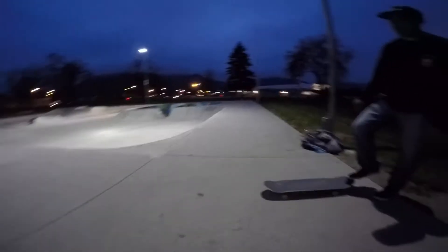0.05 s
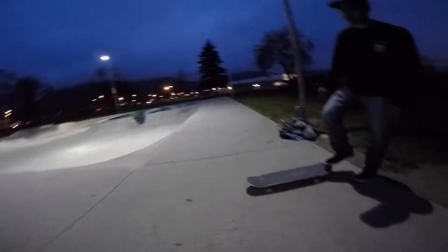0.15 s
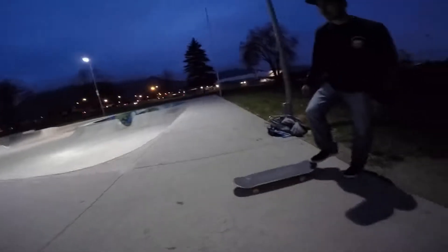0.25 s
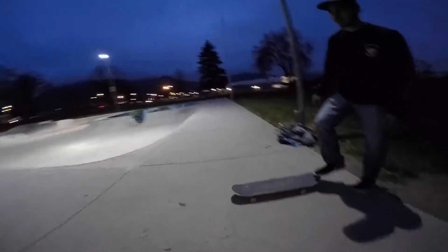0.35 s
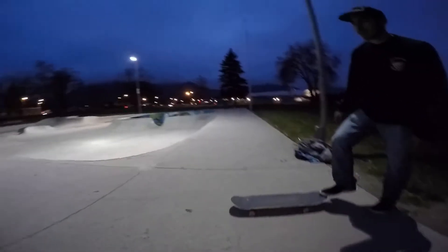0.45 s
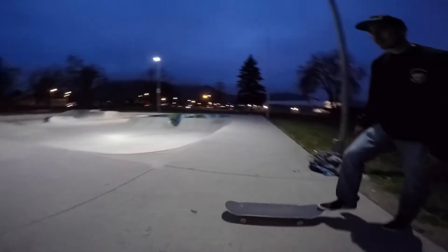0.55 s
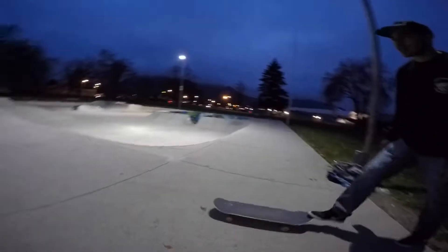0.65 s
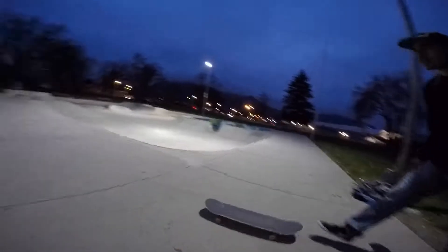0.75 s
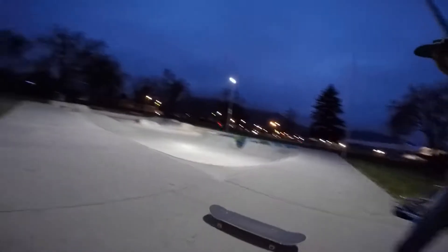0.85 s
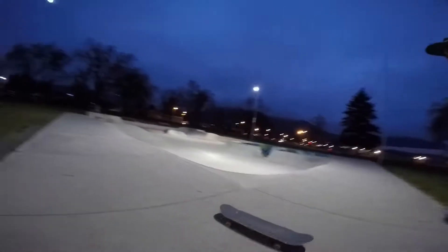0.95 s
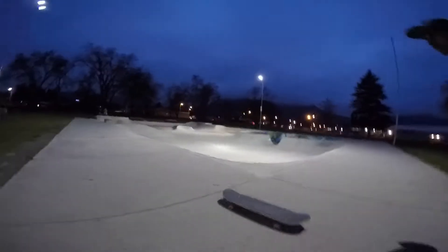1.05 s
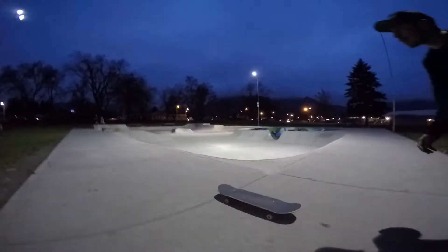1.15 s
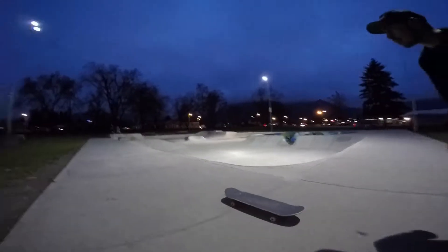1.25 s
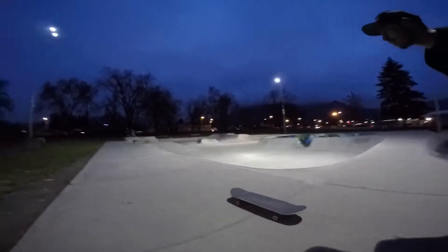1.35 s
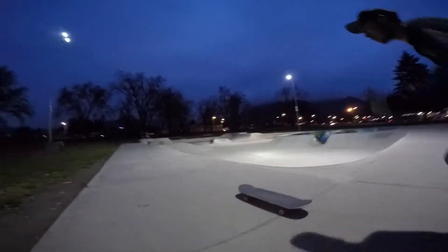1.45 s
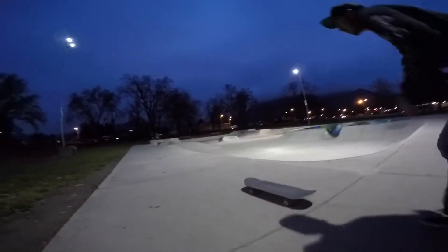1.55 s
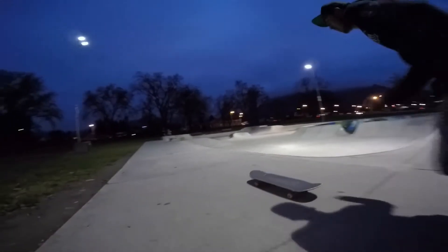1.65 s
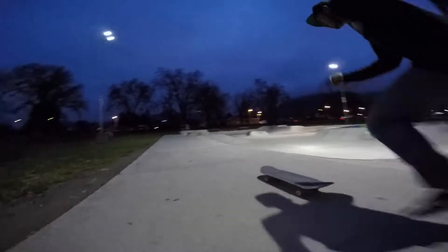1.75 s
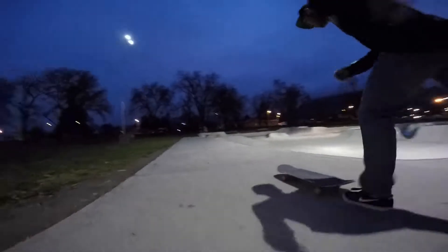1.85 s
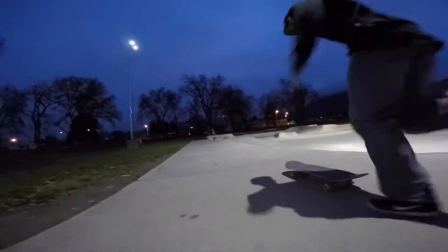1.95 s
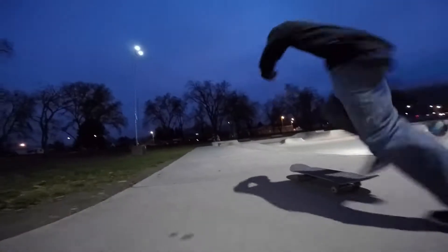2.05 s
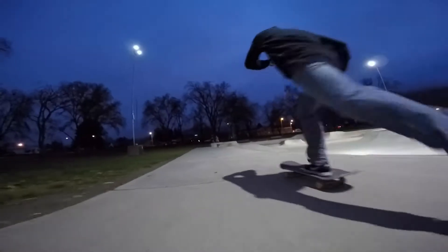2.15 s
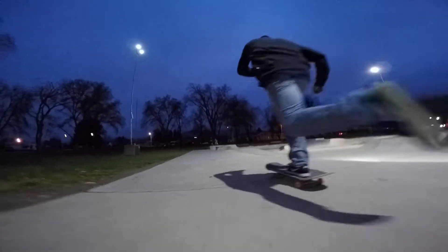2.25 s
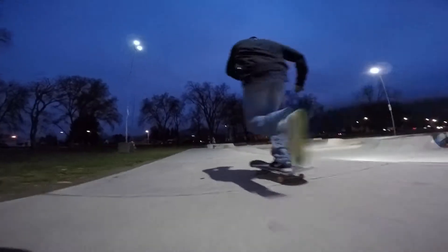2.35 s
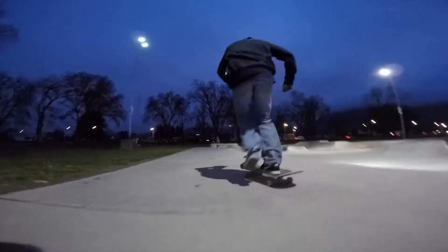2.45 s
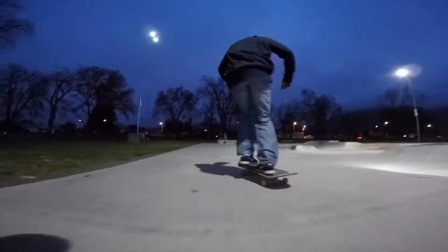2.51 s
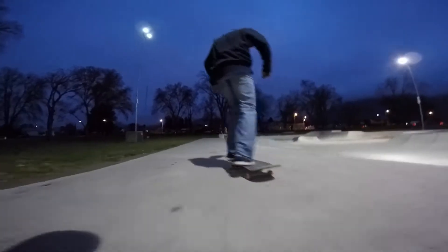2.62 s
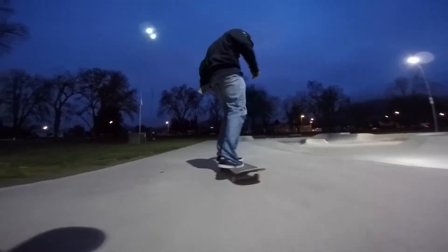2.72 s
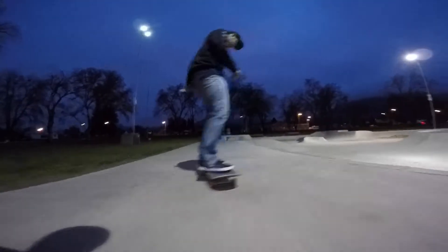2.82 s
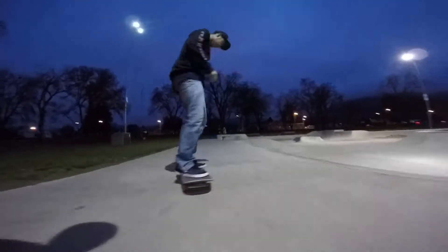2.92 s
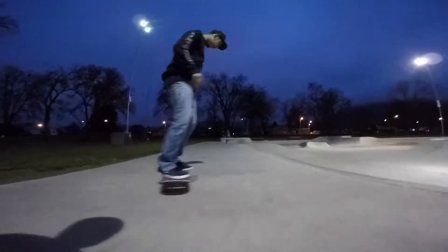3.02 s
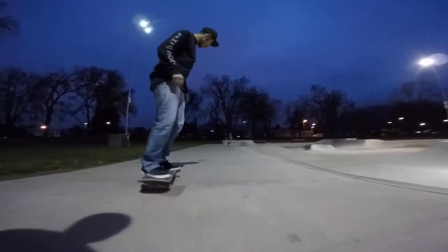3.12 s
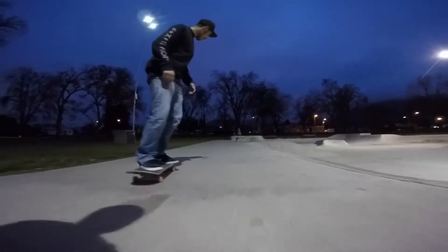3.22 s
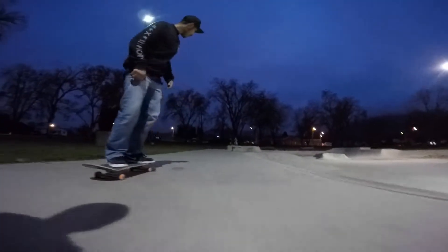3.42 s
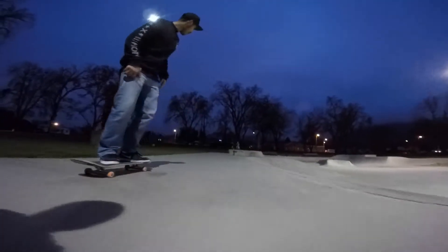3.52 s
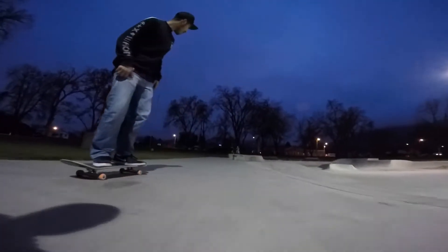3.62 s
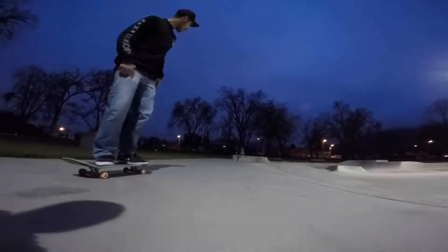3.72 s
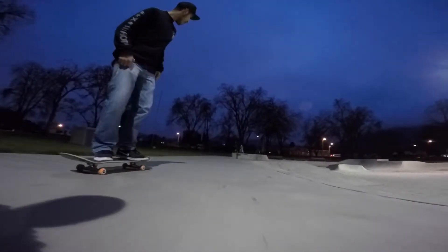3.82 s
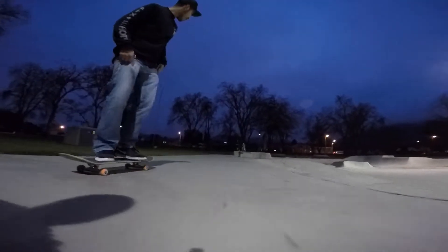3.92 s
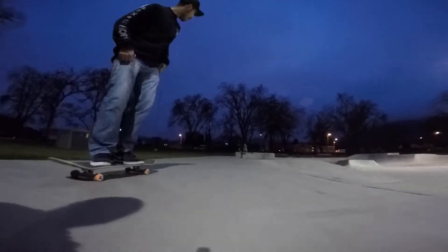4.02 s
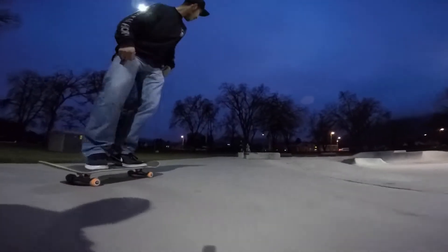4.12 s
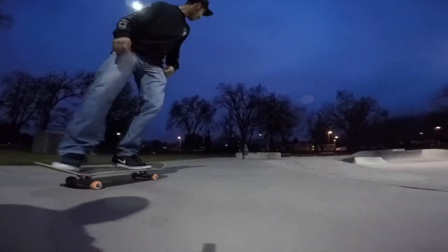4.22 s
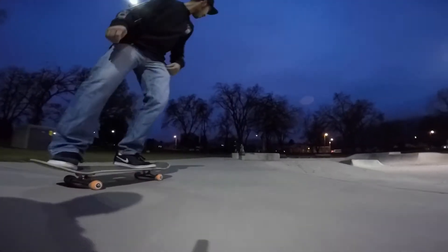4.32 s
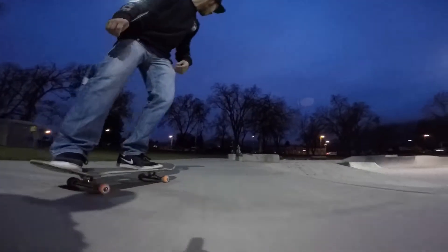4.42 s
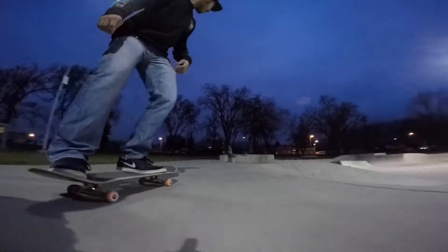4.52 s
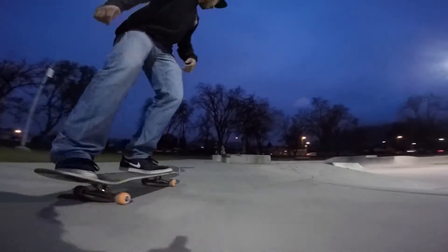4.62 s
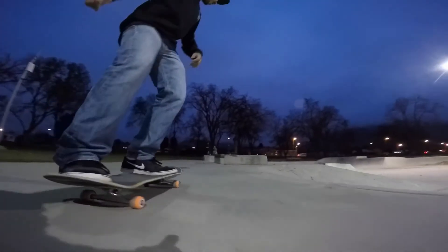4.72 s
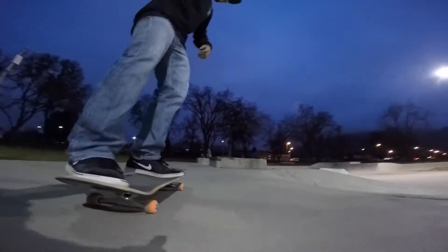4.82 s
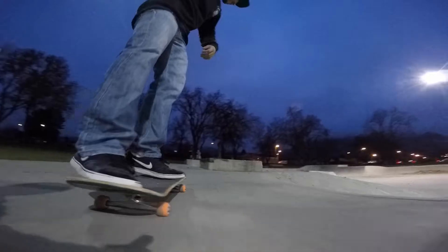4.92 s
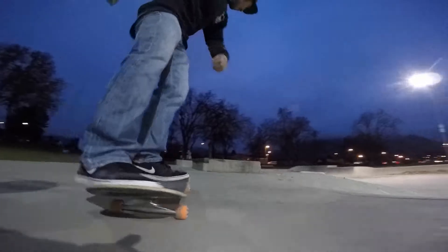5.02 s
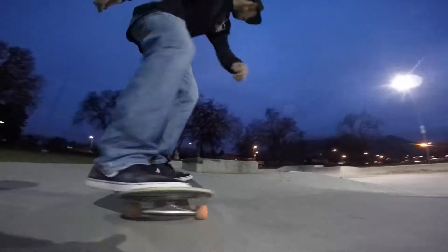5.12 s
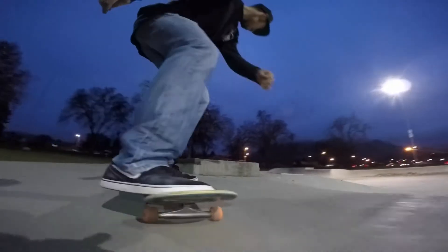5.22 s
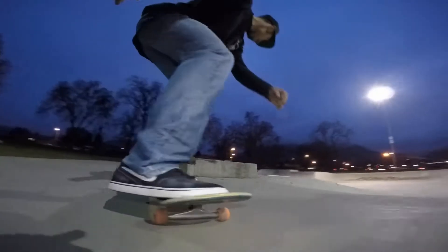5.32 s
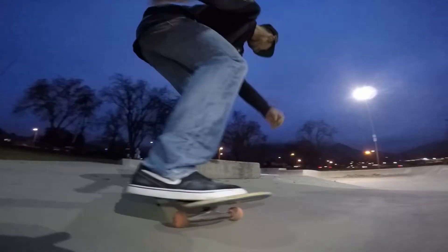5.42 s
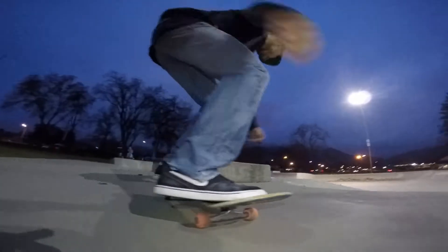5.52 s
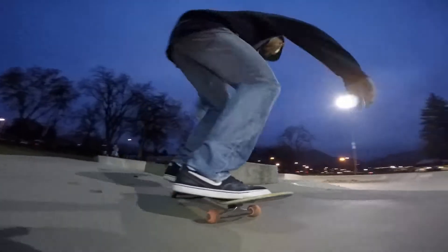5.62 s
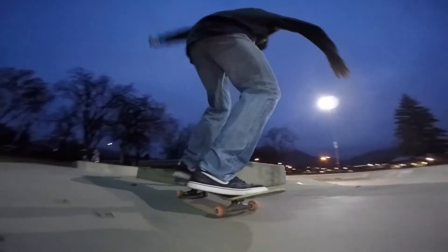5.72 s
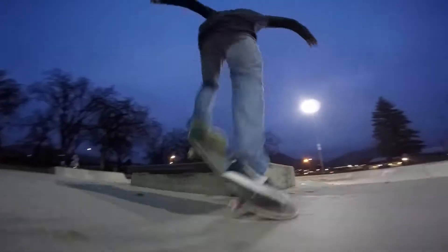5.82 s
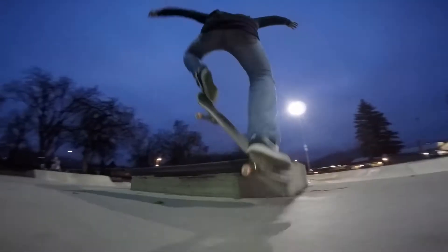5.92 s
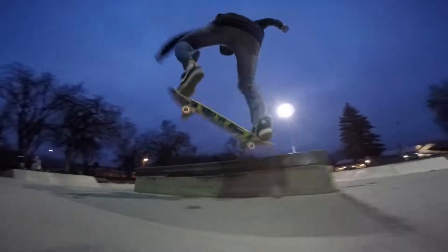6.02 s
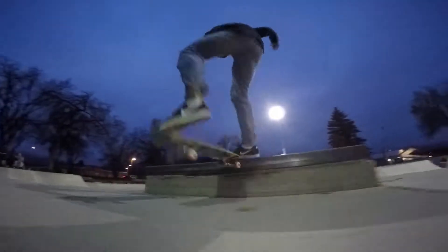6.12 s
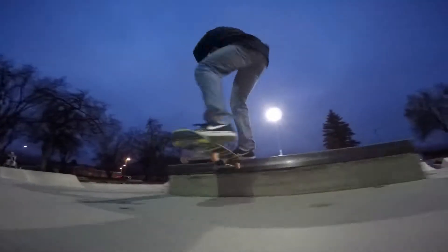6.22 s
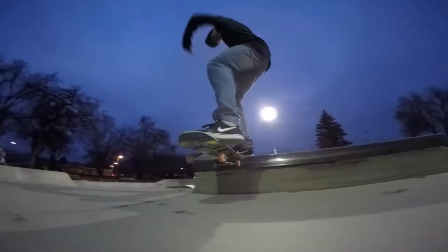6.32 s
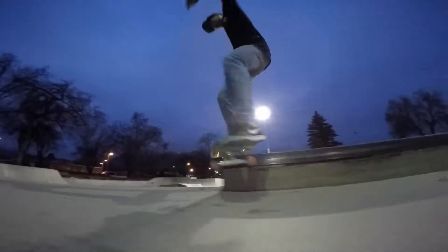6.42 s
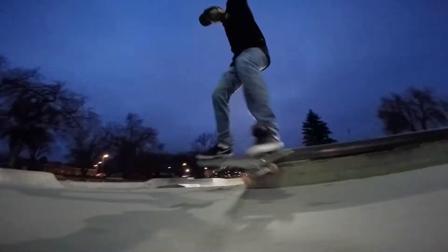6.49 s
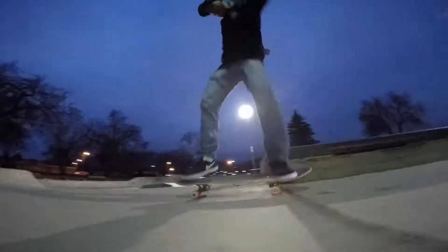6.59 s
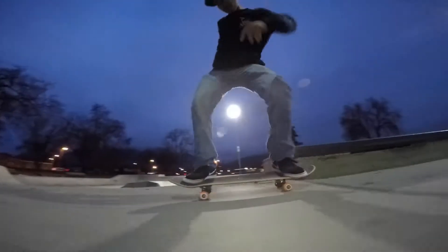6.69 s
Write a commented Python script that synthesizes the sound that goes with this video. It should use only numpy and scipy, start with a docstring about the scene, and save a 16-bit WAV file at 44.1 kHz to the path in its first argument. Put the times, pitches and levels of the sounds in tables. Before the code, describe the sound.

In an outdoor skatepark, a close, moving microphone picks up low gusts of wind and a skateboard on concrete. The board drops with a ringing smack and coasts, ticking over grit. Thuds follow as the rider jumps on, and the roll turns heavier, with frequent sharp clacks. Near the end come a loud wooden crack, a hard hit and short metallic scrape on a ledge, and a clatter.

```python
"""A skateboard on the concrete of an open skatepark, heard from a microphone that follows it.
The board is dropped and rolls away empty; the skater jumps on, rides over slab joints, pops the tail,
grinds a ledge and clatters down. Impacts excite the damped modes of deck and trucks, and surface
roughness drives the rolling noise. Turbulent air buffets the microphone; the hardest blows overload it."""
import sys
import numpy as np
from scipy import signal
from scipy.fft import rfft, irfft, next_fast_len
from scipy.io import wavfile
from scipy.ndimage import uniform_filter1d, map_coordinates

SR = 44100
rng = np.random.default_rng(int(sys.argv[2]) if len(sys.argv) > 2 else 0)


def waveform_to_disk(signal):
    """Save audio, clipped to [-1, 1], as 16-bit WAV at the path in sys.argv[1]."""
    frames = np.transpose(np.atleast_2d(signal))
    scaled = np.clip(frames, -1, 1) * 32767
    samples = np.round(scaled).astype(np.int16)
    wavfile.write(sys.argv[1], SR, samples)


N = 297675
TIME, HIT_TIME = np.arange(N) / SR, np.arange(SR // 8) / SR
DROP_S, TRAP_S, MOUNT_S = 0.0255, 0.28, 2.18  # the board lands; a foot stills it; the skater jumps on

# envelope of the empty board's roll: (time [s], relative rasp level [dB], relative hum level [dB])
EMPTY_ROLL = [(0.3, -77, -80), (0.578, -49, -47), (0.882, -33.5, -37.5), (1.474, -37, -43.5),
              (2.01, -35.5, -45), (2.15, -37, -48)]
# envelope of the roll under the skater: (time [s], relative level [dB])
RIDDEN_ROLL = [(2.2, -28), (2.41, -31), (2.78, -20.5), (2.85, -19), (2.98, -37.5), (3.2, -34),
               (3.34, -28.5), (3.45, -28.5), (3.81, -31), (3.99, -36.5), (4.76, -33.5), (5.75, -30.5),
               (5.9, -40.5), (6.63, -42.5), (6.75, -34)]
# path from board to microphone: (time [s], distance [m])
DISTANCE = [(2.2, 1.2), (3.1, 1.92), (3.7, 1.22), (5.25, 1.09), (6.75, 1.42)]
# spectrum of a wheel striking sand or stone: (frequency [Hz], level [dB])
SAND = [(900, -11), (2500, 7.5), (3400, -3.5), (5000, -12.5), (7000, -25), (15000, -34.5)]


def amp(db):
    """Amplitude ratio of a level in decibels."""
    return 10 ** (np.asarray(db) / 20)


def unit(x):
    """Normalisation to rms 1."""
    return x / np.sqrt(np.mean(x ** 2) + 1e-20)


def unit_burst(x):
    """Normalisation of a transient: its loudest 5 ms have rms 1."""
    return x / np.sqrt(uniform_filter1d(x ** 2, 220, mode="constant").max() + 1e-20)


def along(points, hz):
    """Interpolation of (frequency [Hz], value) points on a logarithmic axis."""
    f, v = np.transpose(points)
    return np.interp(np.log(hz + 1), np.log(f + 1), v)


def curves(rows):
    """Piecewise linear envelopes, one for each column after the time."""
    times, *columns = np.transpose(rows)
    return [np.interp(TIME, times, column) for column in columns]


def wobble(rate):
    """Smooth random modulation with rate knots a second."""
    return map_coordinates(rng.standard_normal(int(N * rate / SR) + 4), [TIME * rate])


def arch(t, length):
    """A rounded envelope: the square root of a half sine."""
    return np.sqrt(np.abs(np.sin(np.pi * np.clip(t / length, 0, 1))))


def add(track, s, sound):
    """Superposition of a sound on the track at time s."""
    start = max(round(s * SR), 0)
    track[start:start + len(sound)] += sound[:N - start]


def filtered(x, response):
    """Linear filtering: the spectrum of x times a frequency response."""
    size = next_fast_len(len(x) + SR // 8, real=True)
    return irfft(rfft(x, size) * response(np.fft.rfftfreq(size, 1 / SR)), size)[:len(x)]


def coloured(x, spectrum):
    """Spectral shaping of x, at rms 1."""
    return unit(filtered(x, lambda hz: amp(along(spectrum, hz))))


def impulse(spectrum, size=1024):
    """Minimum-phase impulse response of a spectrum, by folding its cepstrum."""
    cepstrum = irfft(np.log(amp(along(spectrum, np.fft.rfftfreq(size, 1 / SR)))))
    cepstrum[1:size // 2] *= 2
    cepstrum[size // 2 + 1:] = 0
    return irfft(np.exp(rfft(cepstrum)))


def varied(spectrum):
    """Each contact meets the ground at a new angle, which scatters its spectrum by about 3 dB."""
    return [(hz, db + rng.normal(0, 3)) for hz, db in spectrum]


def resonate(x, modes):
    """Forced response of parallel second-order resonators of alternating sign."""
    return filtered(x, lambda f: sum((-1) ** k * amp(db) * hz * width / (hz**2 - f**2 + 1j * f * width)
                                     for k, (hz, width, db) in enumerate(modes)))


def ring(modes, detune):
    """Free vibration: damped sinusoids, each scattered in level and frequency."""
    t, scatter_db = HIT_TIME, rng.normal(0, 3, len(modes))
    return sum(amp(db + extra - 60 * t / t60) * np.sin(2 * np.pi * hz * rng.normal(1, detune) * t)
               for (hz, db, t60), extra in zip(modes, scatter_db))


def struck(force, response):
    """Convolution of a contact force with a body's impulse response, at unit strength."""
    return unit_burst(signal.fftconvolve(force, response)[:len(force)])


def chatter(length, t60, gap_s):
    """Contact force: a strike and quick rebounds, dwindling after length seconds, add in energy."""
    rebounds = np.cumsum(gap_s * rng.uniform(0.28, 1.7, size=16))
    sizes = amp(rng.normal(-1, 2, size=16)) / (1 + (rebounds / max(length, 0.001)) ** 6)
    age = HIT_TIME - np.append(0, rebounds)[:, None]
    pulses = (age >= 0) * np.append(1, sizes)[:, None] * amp(-60 * np.abs(age) / t60)
    return np.linalg.norm(pulses, axis=0) * rng.standard_normal(len(HIT_TIME))


def grit(rate, spread_db):
    """Shot noise: rate tiny impacts a second on the grain of the concrete."""
    impacts = (rng.random(N) < rate / SR) * rng.standard_normal(N)
    return unit(impacts * amp(spread_db * rng.standard_normal(N)))


def shimmer(x, depth_db):
    """Random drifting peaks and dips imitate interference with a shifting ground reflection."""
    frames = signal.stft(x, nperseg=1024)[2]
    ripple = uniform_filter1d(rng.standard_normal(frames.shape), size=3, axis=0)
    ripple = unit(uniform_filter1d(ripple, size=28, axis=1))
    return unit(signal.istft(frames * amp(depth_db * ripple), nperseg=1024)[1][:N])


def weight():
    """Loading: 0 while the board is empty, 1 once the skater is on it."""
    return np.clip((TIME - MOUNT_S) / 0.004, 0, 1)


def untrapped():
    """Damping by a foot: 1 while the dropped board rings freely, 0 once it is stilled."""
    return np.clip((TRAP_S - TIME) / 0.035 + 1, 0, 1)


def wind():
    """Turbulent pressure fluctuations on the moving microphone, over the hush of the park."""
    gusts = [(0.33, -49.5), (1.29, -22.5), (1.74, -25.5), (2.24, -20.5), (2.98, -18), (3.07, -33.5),
             (3.95, -21.5), (3.98, -28), (5.24, -26.5), (5.38, -14.5), (5.81, -15.5), (6.26, -29),
             (6.75, -30)]  # (time [s], level [dB])
    # spectra of turbulence and hush: (frequency [Hz], level [dB])
    buffet_spectrum = [(12, -9.5), (30, 3.5), (80, -2), (150, -9.5), (250, -16), (420, -22), (650, -65.5)]
    hush_spectrum = [(30, -4.5), (240, -3), (400, -18), (1000, -23.5), (2300, -19), (5000, -35),
                     (15000, -76)]
    buffet = amp(curves(gusts)[0] + wobble(13)) * coloured(rng.standard_normal(N), buffet_spectrum)
    return buffet + amp(-49.5) * coloured(rng.standard_normal(N), hush_spectrum)


def slaps():
    """A short contact has a wide spectrum: bare wood or metal hits concrete and rings the whole plank."""
    # (time [s], crack level [dB], thud level [dB], click level [dB], rattle length [s])
    blows = [(0.0245, -6.5, -6, -8, 0.003), (5.880, -2.5, -21, -8.5, 0.0037),
             (6.1641, -7.5, -11.5, -6.5, 0.0038), (6.6375, -11.5, -17.5, -20, 0.0025),
             (6.6855, -18, -21, -21, 0.004), (6.698, -18, -43, -35, 0.0031)]
    plank_modes = [(1522, 210, -2), (1604, 144, 0), (2115, 240, 5.5), (2686, 510, -2.5), (3100, 140, 1.5),
                   (4060, 170, -10.5), (4630, 880, -17.5)]  # (frequency [Hz], bandwidth [Hz], level [dB])
    click_spectrum = [(2800, -11), (3700, 18.5), (4400, 11.5), (5600, -4), (7500, -3), (11500, -13),
                      (15000, -15)]  # (frequency [Hz], level [dB])
    out, edge = np.zeros(N), impulse(click_spectrum)
    for s, crack_db, thud_db, click_db, length in blows:
        force = chatter(length, t60=0.0073, gap_s=0.00098)
        crack = amp(crack_db) * unit_burst(resonate(force, plank_modes))
        thud = amp(thud_db) * deck_bend(force, s, detune=0.02)
        add(out, s, crack + thud + amp(click_db) * struck(force, edge))
    return out


def deck_bend(force, s, detune):
    """Bending modes thud, deeper under load; below them air flows round the deck and radiates little."""
    bending_modes = [(249, -31, 0.053), (331, 12.5, 0.012), (414.4, 1, 0.044), (508.7, -3, 0.057)]  # (frequency [Hz], level [dB], t60 [s])
    cutoff_hz = 117 if s > MOUNT_S else 260
    radiation = signal.butter(2, cutoff_hz, "highpass", fs=SR, output="sos")
    return struck(force, signal.sosfilt(radiation, ring(bending_modes, detune)))


def park_echo(x):
    """Reverberation: ramps and trees scatter a thin tail that lasts longest in the midrange."""
    decay_times = [(200, 0.063), (2200, 0.3), (5000, 0.11)]  # (frequency [Hz], t60 [s])
    hz, t, frames = signal.stft(rng.standard_normal(SR), SR, nperseg=256)
    envelope = amp(-60 * t / along(decay_times, hz)[:, None]) * (1 - np.exp(-t / 0.0076))
    tail = signal.istft(frames * envelope, SR, nperseg=256)[1]
    return signal.fftconvolve(x, tail / np.linalg.norm(tail))[:N]


def free_ring(level_db, t60):
    """Lightly damped resonance: loose trucks keep the dropped board ringing until a foot stills it."""
    free_modes = [(357, 11, 6.5), (438, 21, 4.5), (558, 24, -7.5), (2100, 600, -9), (2950, 250, -12),
                  (3900, 200, -29), (6450, 250, -29)]  # (frequency [Hz], bandwidth [Hz], level [dB])
    out = np.zeros(N)
    shiver = unit(filtered(resonate(rng.standard_normal(SR), free_modes), lambda hz: hz > 300))
    add(out, DROP_S, amp(level_db - 60 * TIME[:SR] / t60) * shiver)
    return out * untrapped()


def empty_roll(rasp_gain_db, hum_gain_db):
    """Roughness excitation: light wheels rasp and the deck hums; after the drop the trucks buzz alike."""
    # spectra of wheels and free deck: (frequency [Hz], level [dB])
    rasp_spectrum = [(400, -31), (560, -8), (1350, -10), (1750, -2.5), (2450, -2.5), (3300, -13),
                     (4300, -14), (6300, -29.5), (15000, -43.5)]
    hum_spectrum = [(150, -49), (240, 7.5), (285, -24), (365, 9.5), (410, 3), (465, -8), (550, 0),
                    (800, -44.5)]
    rasp_db, hum_db = curves(EMPTY_ROLL)
    age = TIME - DROP_S
    buzz = (age > 0) * untrapped() * amp(-27.5 - 89 * age)  # decays by 89 dB a second
    skitter = amp(0.7 * wobble(60))
    rasp = shimmer(coloured(grit(rate=9000, spread_db=2), rasp_spectrum), depth_db=3)
    rasp *= (amp(rasp_db + rasp_gain_db) + amp(-5.5) * buzz) * skitter
    hum = (amp(hum_db + hum_gain_db) + buzz) * coloured(grit(rate=1200, spread_db=2), hum_spectrum)
    return (1 - weight()) * (rasp + hum)


def bumps(clack_gain_db, thud_gain_db, click_gain_db):
    """Impact excitation: a bump clacks the wheels, rings and bends the deck and, under load, clicks."""
    # knocks of the rolling board, landing feet, one faint slab joint and the final tumble:
    # (time [s], relative clack level [dB], relative thud level [dB], rattle length [s])
    knocks = [(0.049, -20.5, -23, 0.0071), (0.172, -23, -37, 0.005), (0.741, -21, -21.5, 0.0039),
              (1.293, -16, -27, 0.0079), (1.523, -18.5, -22, 0.0053), (1.966, -22, -20, 0.0026),
              (2.29, -12, -7.5, 0.00098), (2.295, -10.5, -5.5, 0.006), (2.31, -15, -14.5, 0.0089),
              (2.354, -13.5, -15, 0.008), (2.391, -10.5, -17, 0.02), (2.403, -15.5, -4.5, 0.017),
              (2.438, -12, -11.5, 0.0098), (2.574, -11.5, -5, 0.0065), (2.626, -15, -7, 0.0048),
              (2.665, -26, -13, 0.0038), (2.893, -15, -12, 0.0089), (2.935, -15.5, -34, 0.01),
              (2.955, -6, -0.5, 0.017), (3.537, -14.5, -14, 0.0035), (3.579, -22.5, -12.5, 0.0024),
              (3.876, -17, -11.5, 0.0071), (4.326, -22.5, -14, 0.0037), (4.439, -23, -15.5, 0.012),
              (5.22, -21.5, -5, 0.0023), (6.082, -18.5, -21, 0.0022), (6.203, -23, -16.5, 0.0031),
              (6.223, -26, -17, 0.009), (6.6, -15, -12, 0.0039), (6.612, -18, -19, 0.02),
              (6.649, -18, -7.5, 0.0024), (6.724, -12.5, -22, 0.001)]
    plywood_modes = [(0.5, -11, 0.016), (0.76, -19, 0.018), (1, 9, 0.013)]  # (frequency ratio, level [dB], t60 [s])
    # spectra of a wheel's clack and its click on a concrete edge: (frequency [Hz], level [dB])
    clack_spectrum = [(300, -44), (560, -5.5), (1100, 3.5), (1300, -3.5), (2200, 5), (2700, -1.5),
                      (3400, -11.5), (4200, -8.5), (6500, -22.5), (7300, -38), (15000, -45.5)]
    click_spectrum = [(2800, -17.5), (4200, 13.5), (5900, 4.5), (7200, -7), (15000, -14.5)]
    out, edge, load = np.zeros(N), impulse(click_spectrum), weight()
    distance, = curves(DISTANCE)
    wood_hz = 2220  # scattered, as knocks land anywhere on the deck
    scattered = [(*row, wood_hz * rng.normal(1, 0.086)) for row in bounces() + knocks]
    for s, clack_db, thud_db, length, ring_hz in joint_crossings() + scattered:
        at = round(s * SR)
        loaded = load[at]
        force = chatter(length, t60=0.036 * loaded + 0.04 * (1 - loaded), gap_s=0.0018)
        # harder and nearer blows are brighter
        click_db = click_gain_db + 1.086 * clack_db - 18 * np.log2(distance[at])
        click = amp(click_db) * loaded * struck(force, edge)
        wheel = struck(force, impulse(varied(clack_spectrum)))
        thud = amp(thud_db + thud_gain_db) * deck_bend(force, s, detune=0.07)
        modes = [(ratio * ring_hz, db, t60) for ratio, db, t60 in plywood_modes]
        wood = amp(-5) * (1 + loaded) / 2 * struck(force, ring(modes, detune=0.01))
        add(out, s, amp(clack_db + clack_gain_db) * (wheel + wood) + click + thud)
    return out


def bounces(first_flight_s=0.0905, restitution=0.54, rattle_s=0.0066):
    """Inelastic rebounds: the dropped board hops ever lower and faster. Gives rows of knocks."""
    hop = np.arange(4)
    times = DROP_S + np.cumsum(first_flight_s * restitution ** hop)
    return [(s, db, db, rattle_s) for s, db in zip(times, -23.5 - 2 * hop)]


def scuffs():
    """Sliding friction: a sole scrapes as it stills the board, and again as the skater leaps for it."""
    scrapes = [(0.254, -33, 0.021), (2.163, -16, 0.028)]  # (time [s], level [dB], length [s])
    sole_spectrum = [(500, -4), (1500, -10.5), (2800, 5.5), (4000, -12), (5400, -10.5), (6300, -28),
                     (15000, -30.5)]  # (frequency [Hz], level [dB])
    swell = sum(amp(db) * arch(TIME - s, length) for s, db, length in scrapes)
    return swell * coloured(grit(rate=4800, spread_db=1.5), sole_spectrum)


def sand_ticks(rate, gain_db, spread_db, t60):
    """Sparse shot noise: the empty wheels flick over sand in bright ticks of uneven size."""
    rasp_db, _ = curves(EMPTY_ROLL)
    ticks = (rng.random(N) < rate / SR) * amp(spread_db * rng.uniform(-1, 1, N))
    force = signal.fftconvolve(ticks, amp(-60 * HIT_TIME / t60))[:N] * rng.standard_normal(N)
    return (1 - weight()) * amp(rasp_db + gain_db) * coloured(force, SAND)


def stone_chips(t60):
    """Light impacts: an empty wheel snaps over a chip of stone, too gently to bend the deck."""
    chips = [(0.774, -27.5), (0.927, -36), (1.054, -23.5), (1.229, -28), (1.337, -24), (1.6227, -18.5),
             (1.867, -30), (1.898, -28), (2.027, -26.5)]  # (time [s], level [dB])
    out = np.zeros(N)
    for s, db in chips:
        force = amp(-60 * HIT_TIME / t60) * rng.standard_normal(len(HIT_TIME))
        add(out, s, amp(db) * struck(force, impulse(varied(SAND))))
    return out


def loose_wheel(flutter_db):
    """Bearing resonance: an unloaded wheel whirrs as the board coasts, and again in the jump."""
    whirrs = [(1.188, 0.79, 2400, -35), (5.885, 0.83, 2060, -47)]  # (time [s], length [s], resonance [Hz], level [dB])
    out, width_hz = np.zeros(N), 440
    for s, length, hz, db in whirrs:
        bearing = [(hz, width_hz, 0)]
        whirr = unit(resonate(resonate(rng.standard_normal(SR), bearing), bearing))
        add(out, s, amp(db) * arch(TIME[:SR], length) * whirr)
    return out * amp(flutter_db * wobble(50))


def ridden_roll(rasp_gain_db):
    """Roughness excitation under load: rough patches swell rasp and rumble; near wheels sound brighter."""
    # spectra of wheels, deck, grit and top octave: (frequency [Hz], level [dB])
    rasp_spectrum = [(450, -22.5), (700, 3.5), (1000, -4.5), (1120, -1), (1280, -9.5), (1600, -1.5),
                     (2250, 3.5), (2800, -3.5), (3400, -14.5), (3800, -7), (6200, -63)]
    rumble_spectrum = [(60, -23.5), (140, 4), (200, -5), (300, -0.5), (385, 2.5), (480, -2), (570, -4),
                       (660, -19.5), (1100, -85)]
    hiss_spectrum = [(2300, 3.5), (4200, 5.5), (5200, 2), (6400, -4), (7200, -16), (12000, -65)]
    fizz_spectrum = [(6000, -11), (7500, 1), (8600, -3.5), (10500, 2.5), (11600, -3), (12700, -12),
                     (14700, -1.5), (15600, -17)]
    roll_db, = curves(RIDDEN_ROLL)
    doublings = np.log2(curves(DISTANCE)[0])  # of distance, from 1 m
    patches_db = 1.5 * wobble(60)
    rasp = shimmer(coloured(grit(rate=5000, spread_db=3), rasp_spectrum), depth_db=2.5)
    rumble = shimmer(coloured(grit(rate=3000, spread_db=2), rumble_spectrum), depth_db=2)
    hiss = shimmer(coloured(rng.standard_normal(N), hiss_spectrum), depth_db=2.2)
    fizz = shimmer(coloured(rng.standard_normal(N), fizz_spectrum), depth_db=2.2)
    pop_s, down_s = 5.88, 6.6
    off_ground = uniform_filter1d(((TIME > pop_s) & (TIME < down_s)) * 1.0, size=800)
    rasp *= amp(roll_db + rasp_gain_db + patches_db)
    rumble *= amp(0.66 * roll_db - 4 + patches_db - 4 * off_ground)
    fizz *= amp(-15 + 2 * doublings)
    treble = amp(roll_db - 3 - 15.5 * doublings + patches_db / 2) * (hiss + fizz)
    return weight() * (rasp + rumble + treble)


def pits(rate, gain_db, t60):
    """Random impacts: loaded wheels drop into small pits, and each dull tick rings the trucks."""
    truck_modes = [(394, 70, 11.5), (1087, 160, 2), (1560, 190, -5.5), (2104, 87, -20), (2150, 1700, 10.5),
                   (3210, 1800, -4.5), (4370, 660, -2)]  # (frequency [Hz], bandwidth [Hz], level [dB])
    ticks = (rng.random(N) < rate / SR) * amp(rng.uniform(-8, 0, N))
    envelope = signal.fftconvolve(ticks, amp(-60 * HIT_TIME / t60))[:N]
    force = envelope * filtered(rng.standard_normal(N), lambda hz: hz < 6500)
    return weight() * amp(gain_db + curves(RIDDEN_ROLL)[0]) * unit(resonate(force, truck_modes))


def joint_crossings(rattle_s=0.0014):
    """Paired impacts: an axle's wheels strike a slab joint in turn. Gives knocks with a ring pitch."""
    # (time [s], first wheel [dB], second wheel [dB], lag [s], thud offset [dB], plywood ring [Hz])
    joints = [(2.877, -8.5, -5, 0.0049, -1.5, 2140), (2.975, -11, -13.5, 0.0063, 7, 2160),
              (3.329, -15, -16.5, 0.013, 7, 2160), (3.429, -17.5, -10, 0.0066, 6, 1940),
              (3.891, -9.5, -13.5, 0.0099, 5.5, 2180), (3.9968, -10, -15, 0.0053, 5.5, 2120),
              (4.288, -13.5, -15.5, 0.0082, 6, 2190), (4.397, -15, -27, 0.0046, 7, 2400),
              (4.683, -12.5, -14.5, 0.01, 7, 2670), (4.7443, -15, -11, 0.0084, 8.5, 1620),
              (4.795, -13.5, -13, 0.0065, 1.5, 2450), (4.867, -19.5, -12, 0.0053, 4, 2350),
              (5.0813, -15, -12.5, 0.009, 9.5, 2270), (5.197, -14.5, -14, 0.0066, 1.5, 1880),
              (5.404, -12, -12.5, 0.011, 4.5, 1930), (5.5217, -9.5, -13.5, 0.0082, -0.5, 1950)]
    return [(wheel_s, db, db + thud_db, rattle_s, ring_hz)
            for s, first_db, second_db, lag, thud_db, ring_hz in joints
            for wheel_s, db in ((s, first_db), (s + lag, second_db))]


def ledge_grind(start_s, sag_per_s, rough_db):
    """Friction drives the ledge's steel edging in two fits; the ring sinks in pitch as the truck slows."""
    steel_modes = [(980, 150, -8), (1250, 35, 6), (1420, 40, 1), (1700, 170, -7)]  # (frequency [Hz], bandwidth [Hz], level [dB])
    friction_spectrum = [(700, -15), (1600, 4), (2500, 4), (3100, 11.5), (4200, 3), (6000, -9),
                         (12000, -23)]  # (frequency [Hz], level [dB])
    fits = [(6.17, -34), (6.24, -35.5), (6.3, -35.5), (6.35, -48), (6.395, -39.5), (6.45, -80)]  # (time [s], level [dB])
    out, t = np.zeros(N), TIME[:SR]
    steel = unit(resonate(rng.standard_normal(SR), steel_modes))
    sinking = map_coordinates(steel, [(t - sag_per_s * t ** 2 / 2) * SR])
    add(out, start_s, sinking + amp(-5) * coloured(rng.standard_normal(SR), friction_spectrum))
    return out * amp(curves(fits)[0] + rough_db * wobble(90))


def scene():
    """Superposition of blows and scrapes, their reverberation, rolling noise and wind."""
    contacts = bumps(clack_gain_db=-3, thud_gain_db=-4, click_gain_db=-4.5) + slaps()
    contacts += free_ring(level_db=-14.5, t60=0.4) + scuffs() + stone_chips(t60=0.02)
    contacts += ledge_grind(start_s=6.1644, sag_per_s=0.4, rough_db=3)
    rolling = empty_roll(rasp_gain_db=-0.5, hum_gain_db=2.5) + ridden_roll(rasp_gain_db=-2.5)
    rolling += sand_ticks(rate=110, gain_db=-4, spread_db=6, t60=0.017)
    rolling += loose_wheel(flutter_db=4)
    rolling += pits(rate=45, gain_db=-4, t60=0.064)
    return (contacts + amp(-23.5) * park_echo(contacts) + rolling + wind())[None]


def record(dry):
    """Saturation and band limiting: the microphone flattens peaks, blocks DC and cuts the top treble."""
    low_hz, top_hz = 8, 15400
    clipped = dry[0] / (1 + np.abs(dry[0]) ** 6) ** (1 / 6)
    return filtered(clipped, lambda hz: hz / np.hypot(hz, low_hz) / (1 + (hz / top_hz) ** 80))[None]


dry = scene()
out = record(dry)
waveform_to_disk(out)
```